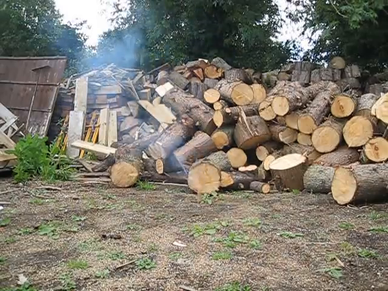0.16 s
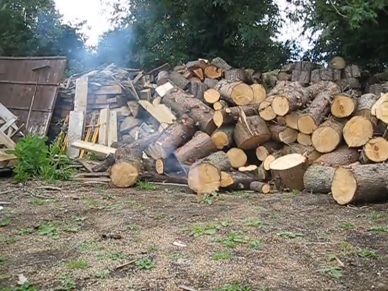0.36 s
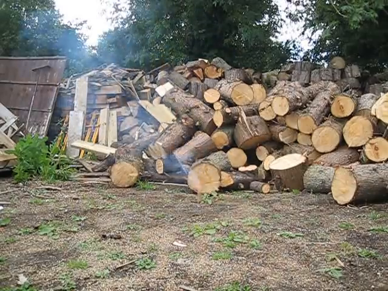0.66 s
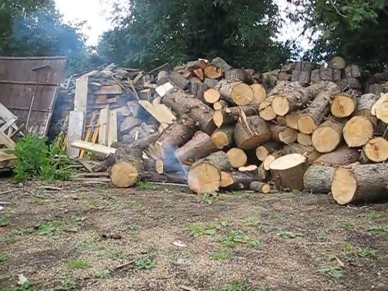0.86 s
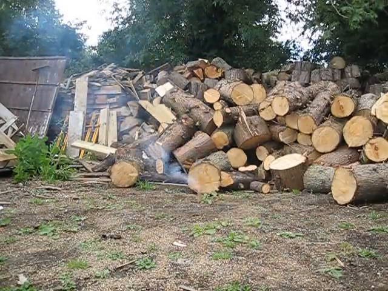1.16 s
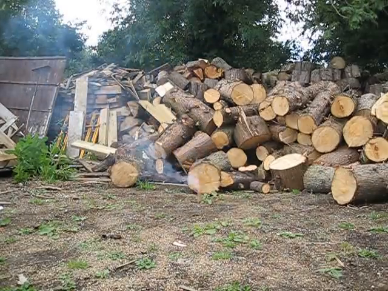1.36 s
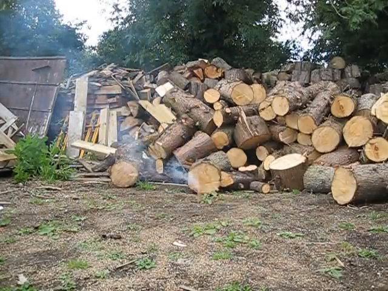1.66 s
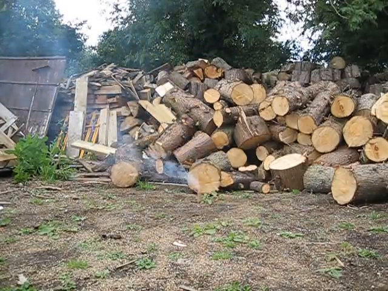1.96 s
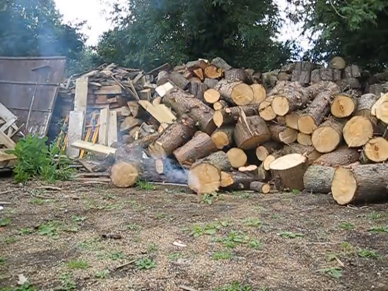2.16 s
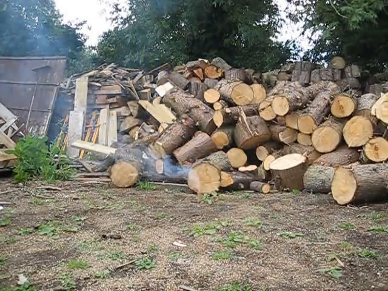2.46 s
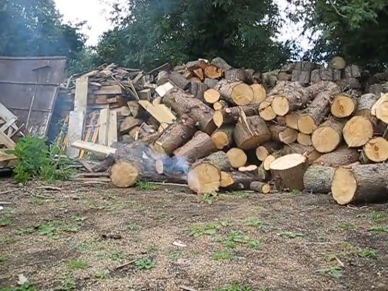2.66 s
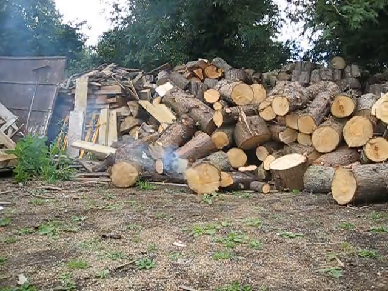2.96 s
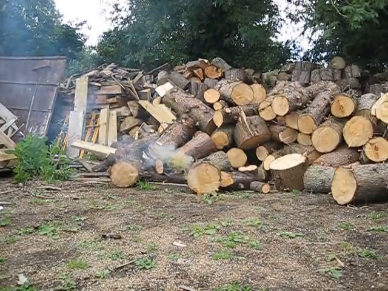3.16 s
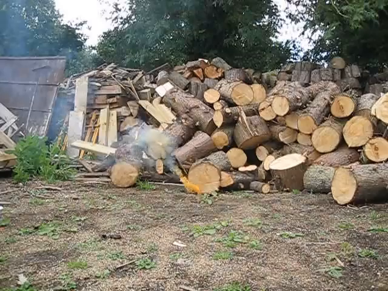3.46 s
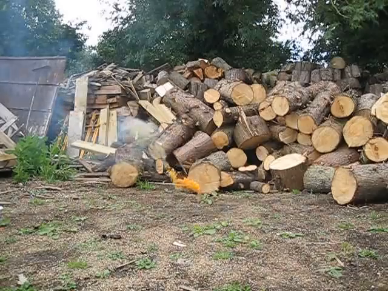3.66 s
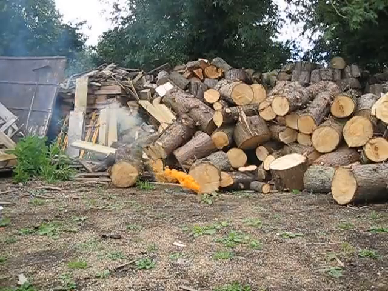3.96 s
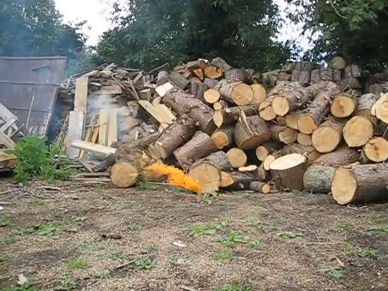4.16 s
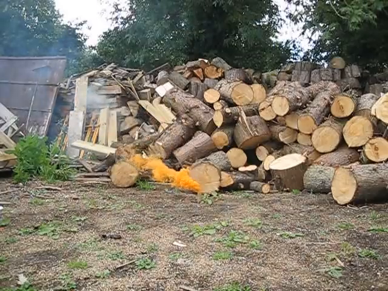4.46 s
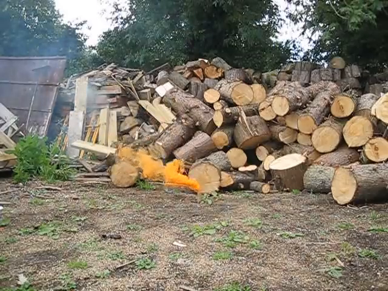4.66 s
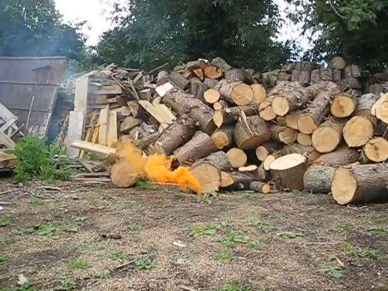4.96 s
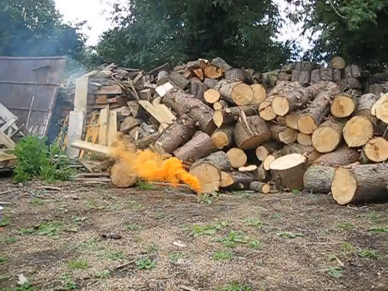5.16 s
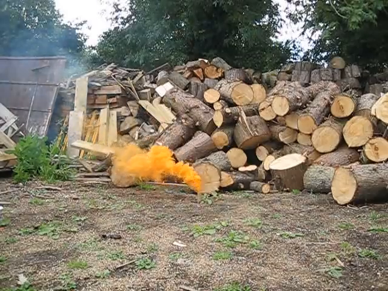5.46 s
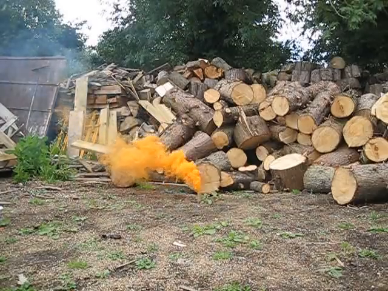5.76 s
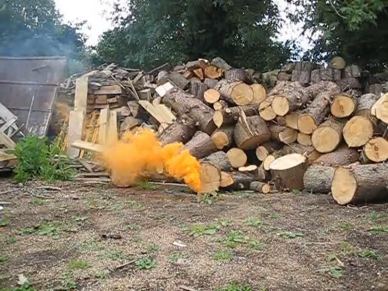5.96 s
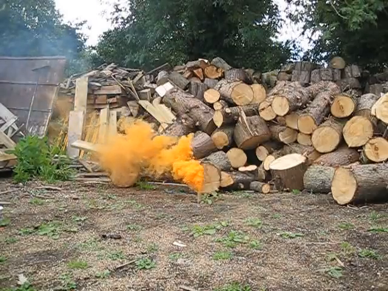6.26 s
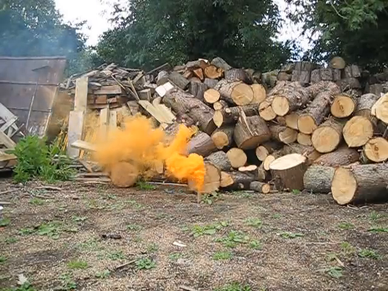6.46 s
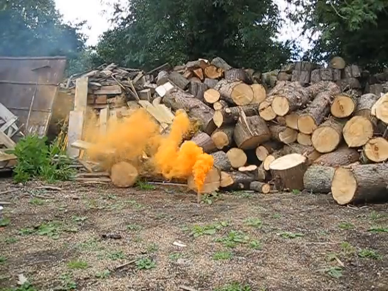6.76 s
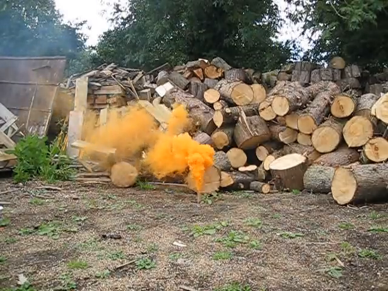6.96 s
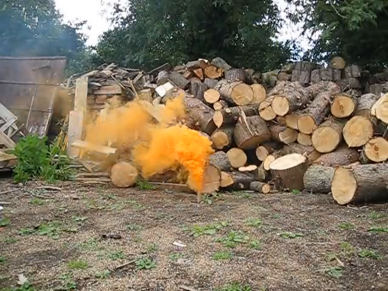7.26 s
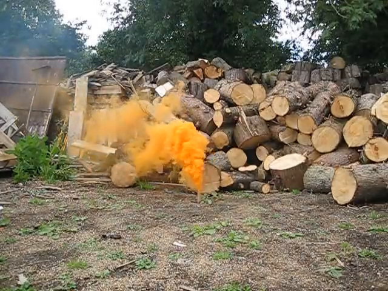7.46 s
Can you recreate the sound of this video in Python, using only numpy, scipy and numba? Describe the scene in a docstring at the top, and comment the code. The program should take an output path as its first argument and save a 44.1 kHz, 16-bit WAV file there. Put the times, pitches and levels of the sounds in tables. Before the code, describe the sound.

A homemade smoke bomb hisses hard and bright a few metres away, with a crackly edge and shifting resonances. After about three seconds it chokes and drops suddenly to a thin, hollow sputter with small spits and ticks. The hiss then catches and grows into a rough, fluttering jet. Behind it, a distant helicopter thuds and rushes in swells through soft outdoor air. Close hard surfaces colour the mono sound.

```python
"""On the ground before a woodpile, a few metres from the microphone, a homemade smoke bomb burns.
The priming hisses hard and dies at 3.1 s; the main charge spits, catches and builds to a fluttering jet.
The hiss is noise and crackle through the vent's wandering resonances; hard surfaces close by echo it.
A distant helicopter, made of pulses and throbbing noise, thuds and rushes over soft outdoor air."""
import sys
import numpy as np
from scipy import signal
from scipy.fft import rfft, irfft, next_fast_len
from scipy.io import wavfile
from scipy.ndimage import uniform_filter1d
from numba import njit

SR = 44100
rng = np.random.default_rng(int(sys.argv[2]) if len(sys.argv) > 2 else 0)


def wrap_up_sound(samples):
    """Save the sound to the file named by the first command line argument, as 16-bit audio."""
    columns = np.atleast_2d(samples).T
    # keep every value between -1 and 1, then stretch to whole-number steps
    tamed = np.clip(columns, -1, 1)
    steps = np.round(tamed * 32767).astype(np.int16)
    wavfile.write(sys.argv[1], SR, steps)


N = 336042
T = np.arange(N) / SR

# colour of the priming's jet: f/Hz, relative level/dB
PRIMING_COLOUR = [(100, -21.5), (500, -19.5), (1400, -12), (2400, -8.5), (3230, -6), (3400, -1),
                  (4300, -0.5), (6200, -8), (7200, -20), (8800, -13.5), (10200, -6), (12200, -4),
                  (13500, -10), (15800, -23.5)]
# the priming runs out; the main charge catches later (s)
BURNOUT_S, CATCH_S = 3.067, 4.863


def jet():
    """Turbulent gas and crackling grains pass the vent's resonances; the flow sets the level."""
    # colour of the main charge's jet: f/Hz, relative level/dB
    charge_colour = [(100, -21), (500, -16), (1400, -11.5), (2400, -8.5), (3230, -3), (3400, 2.5),
                     (4300, -4), (6200, -13.5), (7200, -24), (8800, -17.5), (10200, -12), (12000, -8.5),
                     (13500, -16.5), (15800, -34)]
    # the case rings hollow while the flow is weak: f/Hz, width/Hz, lift/dB
    case_rings = [(1630, 150, 11), (5560, 450, 8)]
    # fixed narrow peaks and dips that give the hiss a pitched edge: f/Hz, width/Hz, change/dB
    edge_peaks = [(730, 110, -4), (865, 110, 4), (2405, 70, 1.5), (3290, 90, -12), (3380, 55, 4.5),
                  (3535, 60, 6), (3810, 60, 1), (3950, 50, 3.5), (4040, 90, -6), (4470, 80, -7)]
    # the emptied case rings most freely at this moment, and for about this long either side
    hollow_at_s, hollow_s = 3.82, 0.55
    handover_s = 1.6  # the main charge's colour takes over
    # a strong jet is steady, a weak one sputters, the growing charge flutters
    steady_db, sputter_db, sputter_s, flutter_db_per_s = 0.99, 3, 0.79, 0.33

    gas = rng.standard_normal(N) + undb(-10.5) * crackle(per_s=1500, spread_db=2.5)
    share = np.minimum(since(BURNOUT_S) / handover_s, 1)
    priming = (1 - share) * colour(gas, PRIMING_COLOUR)
    charge = share * colour(gas, charge_colour)
    gas = vent(priming + charge)
    for hz, width_hz, db in case_rings:
        gas = resonate(gas, hz, width_hz, db * bell(hollow_at_s, hollow_s))
    for hz, width_hz, db in edge_peaks:
        gas = resonate(gas, hz, width_hz, db)
    # the resonances only share out the power that the flow supplies
    gas = gas / np.sqrt(uniform_filter1d(gas ** 2, size=4096))
    weak = (T > BURNOUT_S) * np.exp(-since(BURNOUT_S) / sputter_s)
    depth_db = steady_db + sputter_db * weak + flutter_db_per_s * since(CATCH_S)
    unevenness = 0.57 * walk(45) + 0.5 * walk(130)
    return gas * flow() * undb(depth_db * unevenness)


def flow():
    """Strength of the hiss: the priming burns and collapses; the main charge kindles, smoulders and builds."""
    # gas flow from the priming, ahead of the gain below: t/s, relative level/dB
    priming_flow = [(0.0, -21.5), (0.09, -21), (0.69, -21.5), (0.74, -24), (1.49, -24), (2.13, -25.5),
                    (2.88, -24.5), (2.9, -22.5), (3.05, -25)]
    priming_gain_db, collapse_db_per_s = 0.5, 194
    # shortly before it runs out the priming chokes once: moment, half width, change of level
    choke_at_s, choke_s, choke_db = 2.845, 0.025, -4
    # the main charge kindles from a lower level to a smoulder, and flares once on the way
    smoulder_db, kindle_db, kindle_s = -42, -12, 0.19
    flare_at_s, flare_s, flare_db = 3.78, 0.2, 2
    # it grows quickly once it catches, then creeps on up when the whole face burns
    full_s, grow_db_per_s, creep_db_per_s = 6.285, 9, 3.5

    priming_db = curves(priming_flow)[0] + priming_gain_db
    priming_db = priming_db - collapse_db_per_s * since(BURNOUT_S)
    priming_db = priming_db + choke_db * bell(choke_at_s, choke_s)
    charge_db = smoulder_db + kindle_db * np.exp(-since(BURNOUT_S) / kindle_s)
    charge_db = charge_db + flare_db * bell(flare_at_s, flare_s)
    charge_db = charge_db + grow_db_per_s * (since(CATCH_S) - since(full_s))
    charge_db = charge_db + creep_db_per_s * since(full_s)
    return np.hypot(undb(priming_db), undb(charge_db))


def vent(gas):
    """As the vent burns open and clogs, each of its resonances fades in, glides steadily and fades out."""
    # most glide downward: start t/s, end t/s, start f/Hz, end f/Hz, lift/dB
    vent_glides = [(-.3, 1.8, 3900, 4250, 5.5), (-.3, .9, 12600, 13100, 8), (.35, 1.25, 9000, 9000, 5.5),
                   (.9, 2.42, 6400, 5220, 9), (.9, 2.45, 13000, 14000, 6), (1.7, 3.19, 2650, 2260, 10.5),
                   (2.2, 3.05, 12000, 11000, 6.5), (2.35, 3.2, 3800, 3300, 4), (3.05, 3.22, 7700, 6300, 9),
                   (3.35, 4.3, 5750, 5550, 3), (3.15, 4.73, 13200, 11000, 6.5), (3.15, 3.7, 1850, 1600, 4),
                   (3.6, 5.66, 1450, 1150, 8.5), (6.2, 15, 12000, 11700, 5)]
    fade_share = 0.13  # of a glide's length, at either end
    # a resonance is as wide as this share of its frequency, up to a limit
    width_share, max_width_hz = 0.24, 1740

    for start_s, end_s, start_hz, end_hz, db in vent_glides:
        along = np.clip((T - start_s) / (end_s - start_s), 0, 1)
        hz = start_hz + (end_hz - start_hz) * along
        fade = np.minimum(np.minimum(along, 1 - along) / fade_share, 1)
        width_hz = np.minimum(width_share * hz, max_width_hz)
        gas = resonate(gas, hz, width_hz, db * fade)
    return gas


def spits():
    """Short puffs of gas as lumps of powder flare: noise that swells fast and dies away."""
    # start t/s, relative level/dB, length/s
    spit_table = [(0.658, -18, 0.053), (2.787, -22, 0.03), (3.203, -30.5, 0.022), (3.2997, -35, 0.015),
                  (3.635, -23.5, 0.018), (4.039, -38, 0.018), (4.106, -31, 0.018), (4.29, -27.5, 0.016),
                  (4.735, -31.5, 0.028), (6.725, -13, 0.013), (7.351, -16, 0.025), (7.588, -17, 0.065)]
    push = np.zeros(N)
    for s, db, length_s in spit_table:
        age = since(s)
        swell = 1 - np.exp(-age / 0.003)
        push += undb(db) * swell * np.exp(-2 * age / max(length_s, 0.002))
    return undb(-5.0) * push * colour(rng.standard_normal(N), PRIMING_COLOUR)


def sparks():
    """Sparse, bright ticks of single grains bursting outside the vent."""
    # fine sizzle, strongest while the main charge smoulders: t/s, relative level/dB
    sizzle = [(3.1, -70), (3.25, -65), (3.58, -65), (3.66, -47), (3.8, -51), (3.95, -46), (4.2, -57),
              (5, -54), (6, -72)]
    bright = [(1000, -6), (3500, -16), (7000, -16.5), (12500, 3), (16000, -11)]  # f/Hz, level/dB
    ticks = colour(crackle(per_s=240, spread_db=3.5), bright)
    return ticks * undb(curves(sizzle)[0])


def echoes(x):
    """Reflections just behind the direct sound comb the hiss; the logs scatter a short tail."""
    # close hard surfaces: delays/s
    echo_delays = [.002412, .002572, .00655]
    # their strengths as shares of the direct sound
    echo_shares = [.47, .23, .1]
    size = next_fast_len(N + 8192)
    f = np.fft.rfftfreq(size, 1 / SR)
    paths = 1
    for s, share in zip(echo_delays, echo_shares):
        paths = paths + share * np.exp(-2j * np.pi * f * s)
    logs = rng.standard_normal(N) * (T > 0.004) * np.exp(-T / 0.016)
    scatter = undb(-11) * rfft(logs, size) / np.linalg.norm(logs)
    return irfft(rfft(x, size) * (paths + scatter), size)[:N]


def helicopter(thud_hz=90, thud_s=0.0062, chop=0.09, flicker_db=0.85):
    """Each blade sends one low pressure wave; the rush of the rotor throbs twice per thud."""
    # colour of the rotor's rush: f/Hz, relative level/dB
    wash_colour = [(120, -24), (220, -12), (310, -1), (390, -0.5), (490, -2.5), (640, -10), (850, -15),
                   (1200, -41), (2500, -59)]
    rumble_colour = [(30, -14), (95, 3), (200, -15), (600, -54)]  # f/Hz, level/dB
    blade_hz, blade_at_s = 15.583, 6.961  # thuds a second, and the moment of one
    # it draws nearer: the thuds grow from this level
    start_db, approach_db_per_s = -57.5, 1.39
    # at one swell the rush carries more around 1 kHz: moment, half width, lift
    carry_at_s, carry_s, carry_db = 4.96, 0.075, 12

    turn = (T - blade_at_s) * blade_hz
    age = (turn - np.round(turn)) / blade_hz  # seconds from the nearest blade
    pulse = np.exp(-((age - 0.001) / thud_s) ** 2)
    thuds = unit(np.cos(2 * np.pi * thud_hz * age) * pulse)
    rumble = undb(-5.5) * colour(rng.standard_normal(N), rumble_colour)
    thud_db = start_db + approach_db_per_s * T + 0.98 * walk(19)

    rush = colour(rng.standard_normal(N), wash_colour)
    # changing paths through the air make the strongest pitch of the rush wander
    rush = unit(resonate(rush, 380 * np.exp(0.12 * walk(9)), 62, 3.75))
    rush = resonate(rush, 1000, 300, carry_db * bell(carry_at_s, carry_s))
    rush = rush * (1 + chop * np.cos(4 * np.pi * turn))
    rush_db = rush_level() + flicker_db * walk(30)
    return (thuds + rumble) * undb(thud_db) + rush * undb(rush_db)


def rush_level():
    """Level of the rotor's rush in dB: bell-shaped swells on its way through the air, over a steady base."""
    # peak t/s, half width/s, level/dB, its power added to the base
    rush_swells = [(.11, 0.066, -37), (.97, .09, -43), (1.28, 0.1, -39.5), (1.61, 0.019, -43),
                   (1.971, 0.089, -39), (2.22, 0.096, -50), (2.57, 0.054, -44), (3.42, 0.063, -44),
                   (3.58, 0.099, -38.5), (3.91, 0.11, -41.5), (4.17, 0.067, -40), (4.35, 0.07, -38),
                   (4.54, 0.079, -41), (4.87, 0.14, -32.5), (5.1, 0.15, -33.5), (5.35, 0.25, -40),
                   (5.84, 0.08, -37), (6.4, 0.049, -42), (6.62, 0.069, -38.5), (6.89, 0.17, -38.5),
                   (7.27, .07, -42.5), (7.58, 0.14, -40)]
    base_db = -45.5
    power = undb(base_db) ** 2
    for s, half_width_s, db in rush_swells:
        power = power + undb(db) ** 2 * bell(s, half_width_s)
    return 10 * np.log10(power)


def air():
    """A soft outdoor background: coloured noise whose level wanders slowly."""
    # f/Hz, relative level/dB
    air_colour = [(20, -20), (50, -3), (130, -2.5), (220, -2.5), (700, -5), (1500, -6.5), (4000, -17),
                  (15000, -57)]
    return colour(rng.standard_normal(N), air_colour) * undb(-46.5 + 0.37 * walk(3.14))


def crackle(per_s, spread_db):
    """Tiny bursts of burning grains: many faint, a few strong; rms 1."""
    sizes = undb(spread_db * np.minimum(rng.exponential(size=N), 5))
    bursts = rng.random(N) < per_s / SR
    return unit(bursts * sizes * rng.choice([-1, 1], N))


def resonate(x, hz, width_hz, db):
    """Lift (or cut, below 0) a sound by db around a resonance."""
    return x + (undb(db) - 1) * band(x, hz * np.ones(N), width_hz * np.ones(N))


@njit
def band(x, hz, width):
    """State-variable band-pass with a moving centre and width, gain 1 at the centre."""
    y, band_state, low_state = np.empty(len(x)), 0., 0.
    for i in range(len(x)):
        g = np.tan(np.pi * hz[i] / SR)
        damping = width[i] / hz[i]
        v = (band_state + g * (x[i] - low_state)) / (1 + g * (g + damping))
        band_state = 2 * v - band_state
        low_state = low_state + 2 * g * v
        y[i] = damping * v
    return y


def colour(x, points):
    """Shape a sound by (f/Hz, level/dB) points, joined along log frequency; rms 1."""
    hz, db = np.transpose(points)
    size = next_fast_len(N)
    f = np.maximum(np.fft.rfftfreq(size, 1 / SR), 1)
    gain = undb(np.interp(np.log(f), np.log(hz), db))
    return unit(irfft(rfft(x, size) * gain, size)[:N])


def walk(rate):
    """Smooth random wander of rms 1, with about rate new values a second."""
    k = max(int(SR / rate), 1)
    steps = np.repeat(rng.standard_normal(N // k + 1), k)
    return unit(uniform_filter1d(steps, k)[:N])


def curves(table):
    """Each column of a table after the first, joined by straight lines in time."""
    s, *columns = np.transpose(table)
    return [np.interp(T, s, c) for c in columns]


def bell(peak_s, half_width_s):
    """A smooth rise to 1 and fall around a moment; 1/e at the half width."""
    return np.exp(-((T - peak_s) / half_width_s) ** 2)


def since(s):
    """Seconds gone by after a moment; zero before it."""
    return np.maximum(T - s, 0)


def unit(x):
    """Scale to rms 1."""
    return x / np.sqrt(np.mean(x ** 2))


def undb(db):
    """Decibels to gain."""
    return 10 ** (np.asarray(db) / 20)


def scene():
    """The smoke bomb with its echoes, over the helicopter and the open air."""
    bomb = undb(-1.52) * echoes(jet() + spits() + sparks())
    return (bomb + helicopter() + air())[None]


def record(dry):
    """The microphone has a deep notch near 8 kHz and cuts the top."""
    notch = signal.butter(4, (7540, 8230), "bandstop", fs=SR, output="sos")
    top = signal.ellip(8, 0.2, 70, 15850, fs=SR, output="sos")
    return signal.sosfilt(top, signal.sosfilt(notch, dry))


dry = scene()
out = record(dry)
wrap_up_sound(out)
```